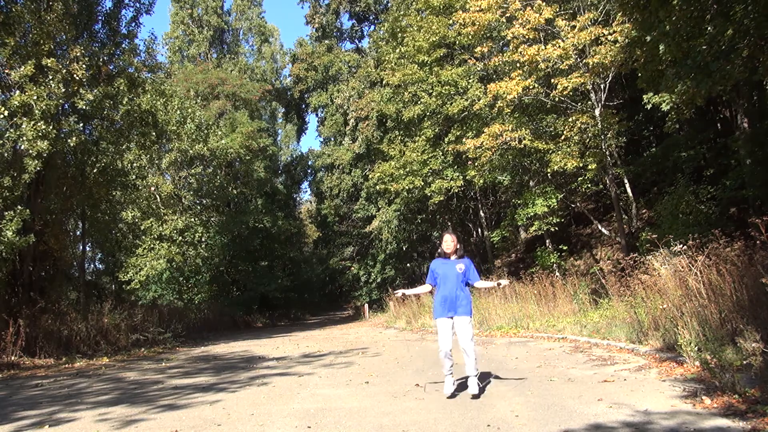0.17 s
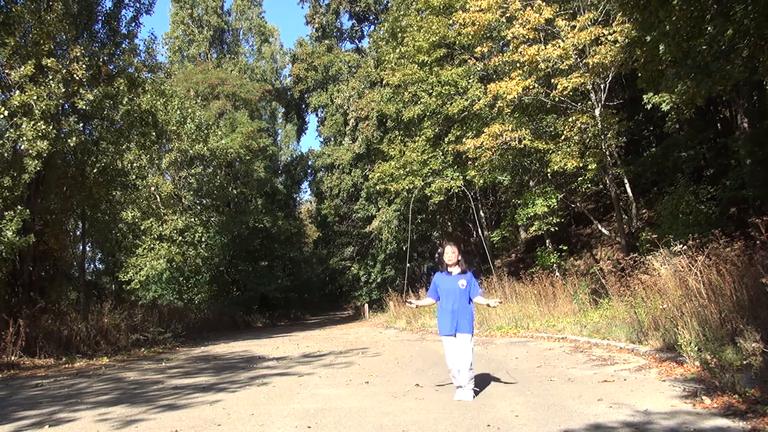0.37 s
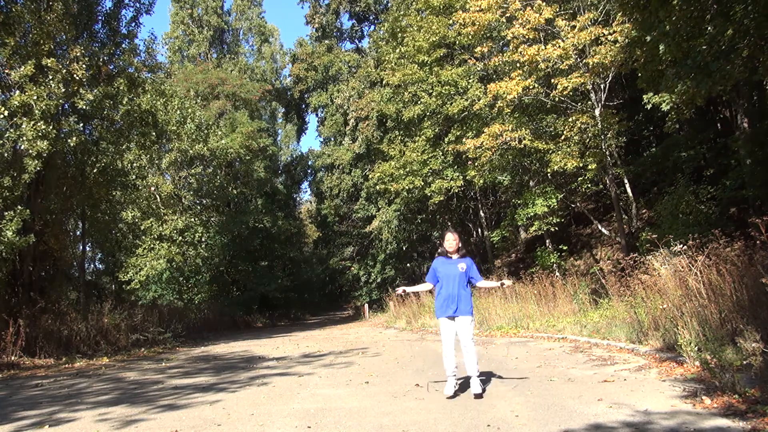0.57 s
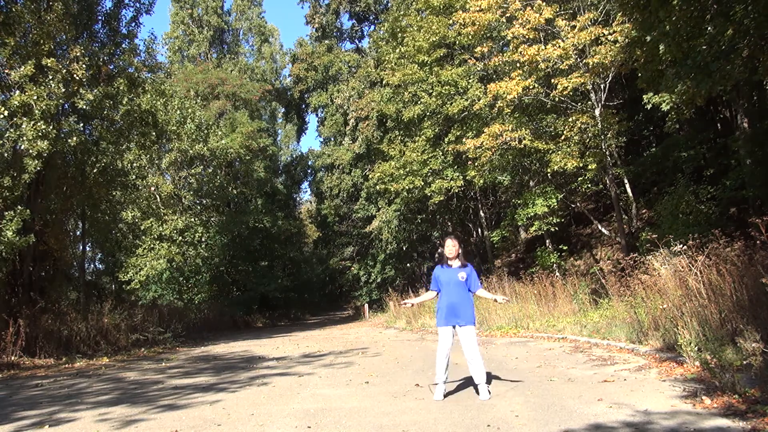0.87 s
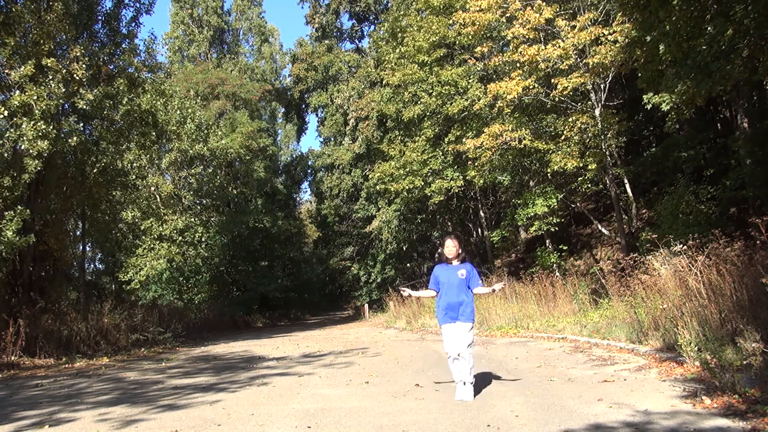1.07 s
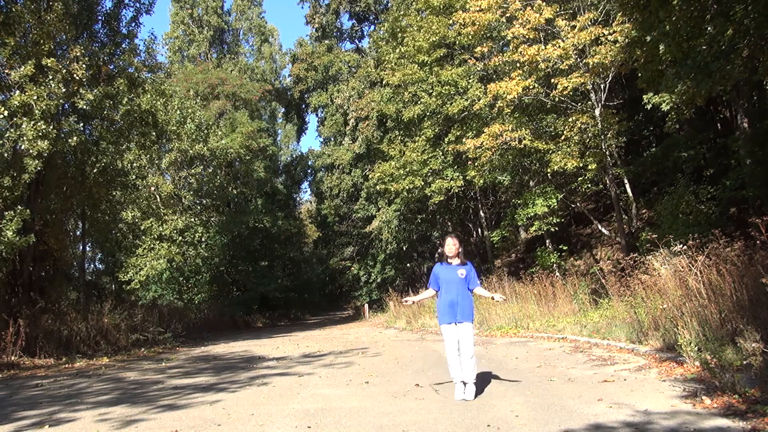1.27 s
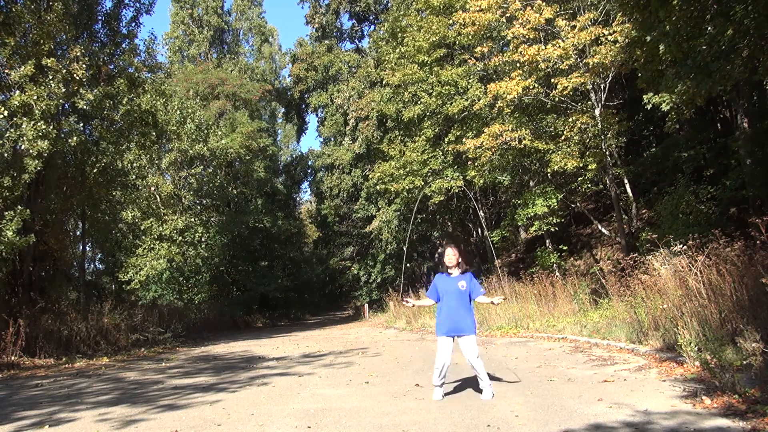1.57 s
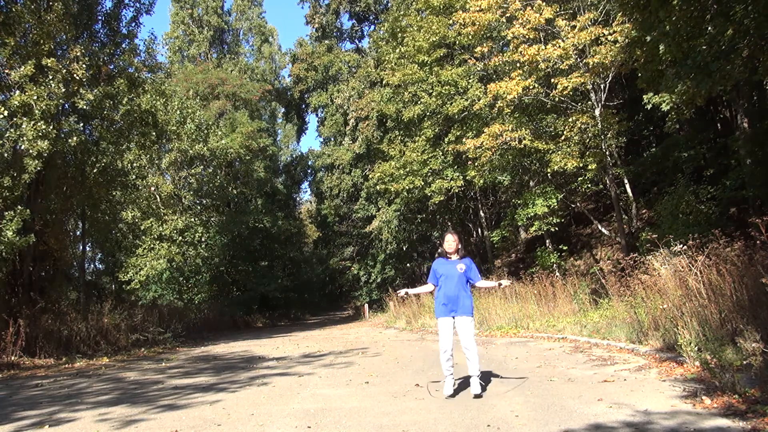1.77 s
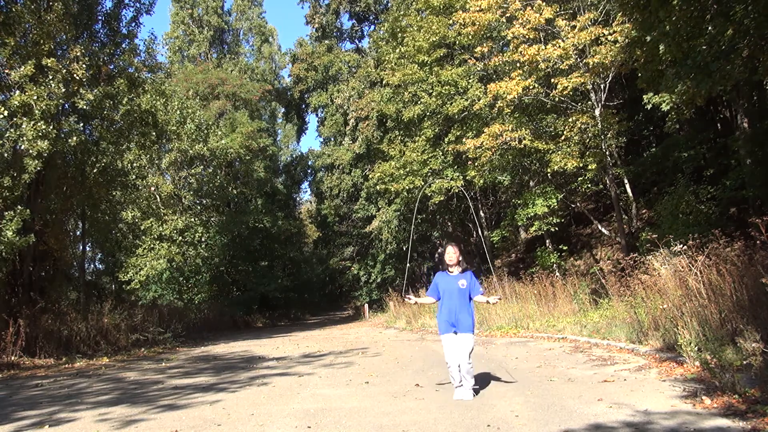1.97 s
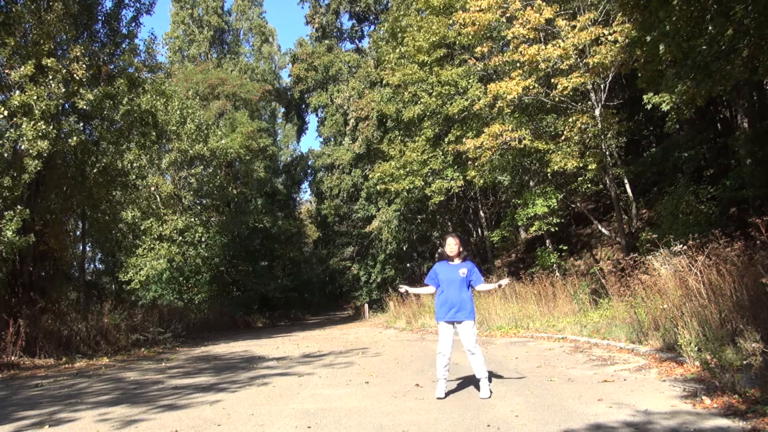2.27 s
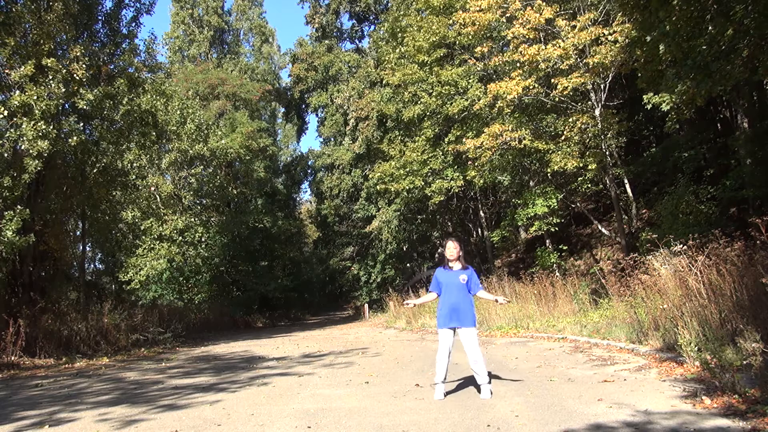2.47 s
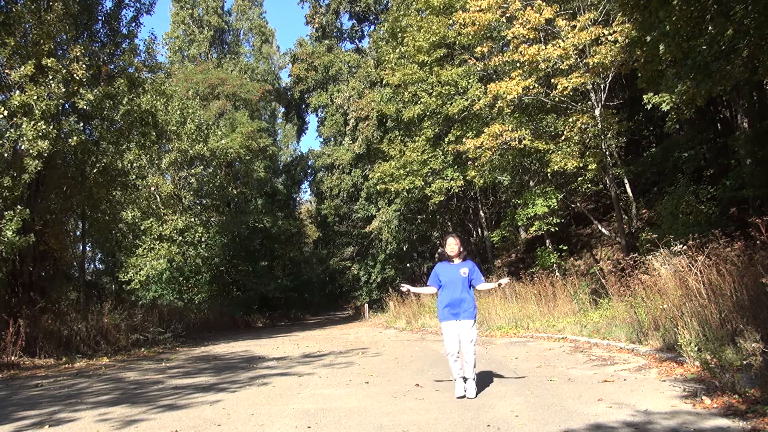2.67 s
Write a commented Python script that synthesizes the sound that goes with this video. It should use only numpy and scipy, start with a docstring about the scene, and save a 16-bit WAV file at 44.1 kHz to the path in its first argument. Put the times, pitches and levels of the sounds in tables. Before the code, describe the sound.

A skipping rope slaps hard paving about every 0.4 seconds, each crack sharp and bright, followed by light shoe taps and a hollow airy whirr; quiet outdoor hush, stereo microphones a few metres away, source slightly right.

```python
"""Skipping rope among trees

On a paved clearing, a few metres from the microphones and to the right, someone skips rope.
The rope hums as noise-modulated tones under hiss, and cracks on the paving as filtered, ringing impulses.
Soles land between slaps as taps, thumps and puffs of air, with small ringing clicks and scuffs of noise.
The trees answer with a faint decaying noise tail, over a quiet outdoor hush of coloured noise and a drone."""
import sys
import numpy as np
from scipy import signal
from scipy.fft import rfft, irfft
from scipy.io import wavfile

SR = 44100
rng = np.random.default_rng(int(sys.argv[2]) if len(sys.argv) > 2 else 0)


def int16_out(signal):
    """Quantize to a 16-bit WAV file."""
    q = np.round(np.clip(np.atleast_2d(signal).T, -1, 1) * 32767)
    wavfile.write(sys.argv[1], SR, q.astype(np.int16))


N = 124362
TIME = np.arange(N) / SR  # seconds


def from_db(db):
    """Amplitude factor for a level in dB."""
    return 10 ** (np.asarray(db) / 20)


def rms_one(x):
    """Scale a signal to an RMS of 1."""
    return x / np.sqrt(np.mean(abs(x) ** 2) + 1e-20)


def colour(x, points):
    """Minimum-phase filter that follows a table of (Hz, dB), straight lines over log frequency."""
    size = 4096
    hz, db = np.transpose(points)
    bins_hz = np.arange(size // 2 + 1) * SR / size
    gain_db = np.interp(np.log(bins_hz + 1), np.log(hz), db)
    cepstrum = irfft(np.log(from_db(gain_db)))
    # folding the cepstrum onto positive time makes the filter causal
    fold = np.r_[1, np.full(size // 2 - 1, 2), 1, np.zeros(size // 2 - 1)]
    impulse_response = irfft(np.exp(rfft(cepstrum * fold)))[:size // 2]
    return signal.fftconvolve(x, impulse_response)[:N]


def resonance(x, hz, q):
    """One resonance with gain 1 at its peak."""
    b, a = signal.iirpeak(hz, q, fs=SR)
    return signal.lfilter(b, a, x + 1e-18)  # the tiny offset avoids denormal numbers


def butterworth(x, hz, kind="low"):
    """Second-order low or high cut."""
    return signal.sosfilt(signal.butter(2, hz, kind, fs=SR, output="sos"), x)


def bell(middle_s, half_s):
    """Smooth swell and fall around a moment; down to 1/e at half_s on either side."""
    return np.exp(-np.minimum(((TIME - middle_s) / half_s) ** 2, 20))


def click(s, db):
    """A single impulse."""
    out = np.zeros(N)
    out[round(s * SR)] = from_db(db)
    return out


def thump(s, db, hz, rise_s):
    """A soft push that swells and dies within a few cycles."""
    age = np.maximum(TIME - s, 0)
    swell = age / rise_s * np.exp(np.maximum(1 - age / rise_s, -100))
    return -from_db(db) * swell * np.sin(2 * np.pi * hz * age)


def flutter(width_hz):
    """Random amplitude and phase of a noise band reaching width_hz to either side of its centre."""
    noise = rng.standard_normal((2, N + SR))
    real, imag = butterworth(noise, width_hz)[:, SR:]  # the first second lets the filter settle
    return rms_one(real + 1j * imag)


# Colour of the open air around the clearing. Each row: frequency in Hz, level in dB before AIR_DB.
AIR = [(20, -32), (30, -21), (55, -6), (110, -6), (190, -6.5), (260, -7), (370, -4), (550, -6.5), (900, -7),
       (1900, -14.5), (4200, -22), (8400, -30), (13600, -37.5), (16000, -41)]
# How wide the air spreads across the pair. Each row: frequency in Hz, side re mid in dB.
AIR_SIDE = [(40, -8), (130, -8), (300, -15), (640, -16), (1400, -17), (3100, -18), (7000, -4), (15000, 5)]
AIR_DB = -30
DRONE_HZ, DRONE_WIDTH_HZ, DRONE_DB = 258.3, 8.6, -61


def background():
    """Steady outdoor hush of coloured noise with a faint far drone, as mid and side."""
    mid, side = (from_db(AIR_DB) * colour(noise, AIR) for noise in rng.standard_normal((2, N)))
    carrier = np.exp(2j * np.pi * DRONE_HZ * TIME)
    drone = np.sqrt(2) * (flutter(DRONE_WIDTH_HZ) * carrier).real
    return mid + from_db(DRONE_DB) * drone, colour(side, AIR_SIDE)


# Colour of the sound scattered by the trees. Each row: frequency in Hz, gain in dB.
TREES = [(200, -11), (700, -19), (2000, -14), (6000, -14.5), (9000, -18.5), (15000, -7)]
TREES_T60_S, TREES_RISE_S, TREES_SIDE_DB = 0.68, 0.004, -11


def trees(x):
    """Trunks and leaves scatter a thin, smooth tail of decaying noise, as mid and side."""
    rise = 1 - np.exp(-TIME / TREES_RISE_S)
    envelope = rise * from_db(-60 * TIME / TREES_T60_S)
    echoes = rng.standard_normal((2, N)) * envelope / np.linalg.norm(envelope)
    scattered = colour(x, TREES)
    mid, side = (signal.fftconvolve(scattered, echo)[:N] for echo in echoes)
    return mid, from_db(TREES_SIDE_DB) * side


# Soles rubbing the paving. Each row: middle in seconds, half length in seconds, level in dB, pitch in Hz.
SCUFFS = [(0.069, 0.0065, -48.5, 2300), (.297, 0.003, -44, 6540), (0.316, .012, -49.5, 1550),
          (0.732, 0.0082, -52, 990), (0.775, 0.014, -46.5, 2200), (1.131, 0.015, -47, 1710),
          (1.499, 0.0052, -38, 2100), (1.510, .008, -38, 2380), (1.647, 0.0087, -55.5, 2470),
          (2.288, 0.0053, -42, 2050), (2.758, 0.008, -43, 1859)]
SCUFF_Q, SCUFF_ROUGH_DB, SCUFF_ROUGH_HZ = 3.1, 4, 550


def scuffs():
    """Short gritty rubs of a sole: noise of uneven strength through a resonance."""
    out = 0
    for s, half_s, db, hz in SCUFFS:
        roughness = from_db(SCUFF_ROUGH_DB * flutter(SCUFF_ROUGH_HZ).real)
        grit = rng.standard_normal(N) * roughness
        rub = rms_one(resonance(resonance(grit, hz, SCUFF_Q), hz, 1))
        out = out + from_db(db) * rub * bell(s, half_s)
    return out


# Light clicks of the handles and of grit underfoot.
# Each row: start in seconds, impulse level in dB before the top is softened, ring in Hz.
CLICKS = [(0.0629, -23, 2360), (0.3737, -31.5, 2100), (.3972, -33.5, 2090), (.4612, -31.5, 2540),
          (.5095, -30.5, 2190), (0.7065, -29.5, 2520), (0.7734, -18, 1940), (0.7817, -32, 2793),
          (1.0717, -27, 1980), (1.1967, -27.5, 1711), (1.486, -19, 1900), (1.6467, -28, 2477),
          (1.9583, -31, 1690), (2.0514, -23, 1770), (2.5827, -24, 1580), (2.6353, -11.5, 1230)]
CLICK_Q, CLICK_RING_DB, CLICK_TOP_HZ = 3.6, 20.5, 3900


def small_clicks():
    """Dry ticks that ring for a few cycles, with a softened top."""
    ticks = 0
    for s, db, hz in CLICKS:
        tick = click(s, db)
        ticks = ticks + tick + from_db(CLICK_RING_DB) * resonance(tick, hz, CLICK_Q)
    return butterworth(ticks, CLICK_TOP_HZ)


# Shoes landing on the paving. Each row: start in seconds, thump level in dB before its low cut,
# thump pitch in Hz, sole tap level in dB before its colour.
STEPS = [(0.3021, -34.5, 256, -16.5), (0.3146, -32.5, 236, -30), (0.7239, -38, 279, -12.5),
         (.7340, -32.5, 320, -13.5), (1.1125, -35.5, 246, -17.5), (1.121, -43, 218, -16),
         (1.5262, -34, 254, -15), (1.5357, -31, 274, -13), (1.9032, -26, 249.4, -8),
         (1.921, -31.5, 268, -10.5), (1.9327, -27.5, 264, -1), (2.3379, -48, 258.5, -11),
         (2.3493, -25, 292, -9.5), (2.7390, -29.5, 265, -12), (2.7540, -34, 246.5, -14)]
# Colour of the sole tap. Each row: frequency in Hz, gain in dB.
TAP = [(150, -25), (450, 18), (900, 2.5), (1800, 10.5), (2700, -8), (5000, -8.5), (9000, -16), (15000, -32)]
THUMP_RISE_S, THUMP_LOW_HZ = 0.0014, 108
# the sole flattens and squeezes out air: level re the thump, pitch, sharpness, decay
PUFF_DB, PUFF_HZ, PUFF_Q, PUFF_DECAY_S = -7, 740, 1.4, 0.0048


def footfalls():
    """Each sole taps the paving; the weight follows as a short thump with a puff of air."""
    taps, thumps, press = 0, 0, 0
    for s, thump_db, hz, tap_db in STEPS:
        taps = taps + click(s, tap_db)
        thumps = thumps + thump(s, thump_db, hz, THUMP_RISE_S)
        decay = np.exp(-np.clip((TIME - s) / PUFF_DECAY_S, 0, 20))
        press = press + from_db(thump_db + PUFF_DB) * (TIME > s) * decay
    puffs = press * rms_one(resonance(rng.standard_normal(N), PUFF_HZ, PUFF_Q))
    return colour(taps, TAP) + puffs + butterworth(thumps, THUMP_LOW_HZ, "high")


# The rope hitting the ground, which also marks its turns. Each row: start in seconds, crack level in dB,
# ring in Hz, delay of the next contact in seconds, its level in dB re the crack, patter level in dB,
# patter time scale in seconds. Levels are before the crack colour.
SLAPS = [(0.174, 2.5, 6400, 0.0037, -6, 1, 0.016), (.5810, 2.5, 6850, .0018, -27, -2, 0.017),
         (0.9771, 2, 6603, 0.0027, -5, -0.5, 0.014), (1.39, -6.5, 6500, 0.00079, 7, -0.5, 0.012),
         (1.7912, 2.5, 8010, .0106, -4.5, 0.5, .014), (2.2089, -1, 6500, .0028, -3.5, -5, 0.014),
         (2.6005, 0, 7340, .0012, 3, 0, .013)]
# Rope speed over one turn, as the pitch of its air tone at TONE_REFERENCE_DB.
# Each row: share of the turn after the slap, pitch in Hz.
TURN_PITCH = [(0, 604.5), (.09, 519.5), (.24, 511.5), (.38, 559.5), (.48, 585.4), (.66, 539.9), (.8, 600.6),
              (.9, 580.6), (1, 604.5)]
# Parts of the loop sweeping past. Each row: middle in seconds, half length in seconds, level in dB.
WHOOSHES = [(.005, 0.011, -33.5), (0.091, 0.025, -31.5), (0.148, 0.013, -29), (0.265, 0.026, -40.5),
            (0.359, 0.0064, -36.5), (0.463, 0.0051, -37.5), (.491, 0.0084, -33.5), (0.557, 0.011, -33),
            (.683, 0.01, -36), (0.882, 0.021, -39.5), (0.939, 0.015, -36), (0.974, 0.0049, -35.5),
            (1.076, 0.021, -41), (1.196, 0.0059, -36), (1.305, 0.027, -40), (1.375, 0.019, -35),
            (1.498, 0.019, -35), (1.597, 0.013, -38.5), (1.71, 0.0093, -35), (1.766, 0.024, -36.5),
            (1.862, 0.029, -40), (1.909, 0.0099, -35.5), (2.107, 0.025, -38), (2.186, 0.027, -39),
            (2.312, 0.034, -38.5), (2.384, 0.032, -43), (2.511, 0.019, -35), (2.576, 0.016, -32),
            (2.688, 0.023, -34), (2.812, 0.029, -38.5)]
# Turbulence around the rope. Each row: frequency in Hz, level in dB before the whoosh level.
HISS = [(400, -25), (900, -25.5), (2000, -8), (4500, -26.5), (8000, -22.5), (15000, -31)]
TURN_S = 0.405  # length assumed for the turns before the first slap and after the last
WHIRL_BASE_DB = -48.5  # the hum between whooshes
TONE_HZ_PER_DB, TONE_REFERENCE_DB = 3, -37  # a faster, louder sweep also sounds higher
CORE_WIDTH_HZ, CORE_EVEN = 28.8, 0.56  # evenness: 0 leaves the flutter as it is, 1 nearly flattens it
SKIRT_WIDTH_HZ, SKIRT_DB, SKIRT_SHIFT_HZ = 81, -7, 50.29  # the breathy edge lies mostly above the tone
OCTAVE_DB = -20


def rope_whirl():
    """Eddies shed by the rope make a hollow tone over a thin hiss; pitch follows its speed round each turn."""
    slaps = [row[0] for row in SLAPS]
    starts = np.r_[slaps[0] - TURN_S, slaps, slaps[-1] + TURN_S]
    turn = np.interp(TIME, starts, np.arange(len(starts))) % 1
    sweeps = sum(from_db(db) ** 2 * bell(s, half_s) for s, half_s, db in WHOOSHES)
    power = from_db(WHIRL_BASE_DB) ** 2 + sweeps
    pitch = np.interp(turn, *np.transpose(TURN_PITCH))
    pitch = pitch + TONE_HZ_PER_DB * (10 * np.log10(power) - TONE_REFERENCE_DB)
    tone = np.exp(2j * np.pi * np.cumsum(pitch) / SR)

    core = flutter(CORE_WIDTH_HZ)
    core = rms_one(core / (abs(core) + 0.3) ** CORE_EVEN)
    shift = np.exp(2j * np.pi * SKIRT_SHIFT_HZ * TIME)
    skirt = from_db(SKIRT_DB) * flutter(SKIRT_WIDTH_HZ) * shift
    octave = from_db(OCTAVE_DB) * flutter(2 * SKIRT_WIDTH_HZ) * tone ** 2
    eddies = (core + skirt) * tone + octave
    hiss = colour(rng.standard_normal(N), HISS)
    return np.sqrt(2 * power) * (eddies.real + hiss)


BUMP_S, BUMP_DB, BUMP_HZ, BUMP_RISE_S = 0.581, -44.5, 42, 0.0076


def low_bump():
    """A low, soft push under the second slap."""
    return thump(BUMP_S, BUMP_DB, BUMP_HZ, BUMP_RISE_S)


# The rope touching the ground again. Each row: start in seconds, level in dB before the crack colour.
REBOUNDS = [(.5955, -19), (1.419, -9), (2.2232, -8), (2.6252, -25)]
# Colour of rope on paving. Each row: frequency in Hz, gain in dB.
CRACK = [(200, -22.5), (600, -10), (1100, -5.5), (1900, 1.5), (3500, 2.5), (5300, 1), (8500, 2),
         (10500, -4), (12000, -9), (13800, -13.5), (15500, -36)]
RING_Q, RING_DB = 4.75, -1
# the rope lays itself down along the ground; the fall is reached after one patter time scale
CONTACTS_PER_S, GRIT_DB, PATTER_FALL_DB, PATTER_CURVE = 770, -1.5, 15, 1.3
SCATTERED_SLAP_DB = 5.5  # re the patter level


def rope_slaps():
    """A sharp first crack, then a fast patter of weaker contacts as more rope meets the paving."""
    out = sum(click(s, db) for s, db in REBOUNDS)
    for s, db, hz, next_s, next_db, patter_db, length_s in SLAPS:
        age = np.clip((TIME - s) / length_s, 0, 2)
        contacts = (rng.random(N) < CONTACTS_PER_S / SR) * rng.uniform(0.13, 1, N)
        grains = rms_one(contacts) + from_db(GRIT_DB) * rng.standard_normal(N)
        fall = from_db(-PATTER_FALL_DB * age ** PATTER_CURVE)
        patter = grains * (age > 0) * (age < 2) * fall
        patter = from_db(patter_db) * patter / np.linalg.norm(patter)
        hits = click(s, db) + click(s + next_s, db + next_db) + patter
        out = out + hits + from_db(RING_DB) * resonance(hits, hz, RING_Q)
    return -colour(out, CRACK)


def slaps_toward_trees():
    """Each slap as the trees receive it: one coloured impulse, its level tied to the patter."""
    impulses = sum(click(row[0], row[5] + SCATTERED_SLAP_DB) for row in SLAPS)
    return colour(impulses, CRACK)


# How the left microphone hears what comes from the right. Each row: frequency in Hz, left re right in dB.
LEFT = [(50, -2.5), (300, -5), (700, -4.5), (1500, -6), (2500, -5.5), (4800, -5.5), (8000, -1), (11000, -5),
        (15000, -14)]
LEFT_LAG_S, LEVEL_DB = 0.000008, 1.5  # the level applies to both sides


def scene():
    """The skipper, the trees and the background, all leaning to the right."""
    air, air_side = background()
    soft = rope_whirl() + footfalls() + small_clicks() + scuffs()
    tail, tail_side = trees(soft + slaps_toward_trees())
    mid = rope_slaps() + soft + tail + air + low_bump()
    side = tail_side + air_side
    left = np.interp(TIME - LEFT_LAG_S, TIME, colour(mid + side, LEFT))
    right = mid - side
    return from_db(LEVEL_DB) * np.array([left, right])


CUTOFF_HZ = 16300


def record(dry):
    """The top is cut steeply."""
    steep_cut = signal.ellip(10, 0.1, 80, CUTOFF_HZ, fs=SR, output="sos")
    return signal.sosfilt(steep_cut, dry)


dry = scene()
out = record(dry)
int16_out(out)
```